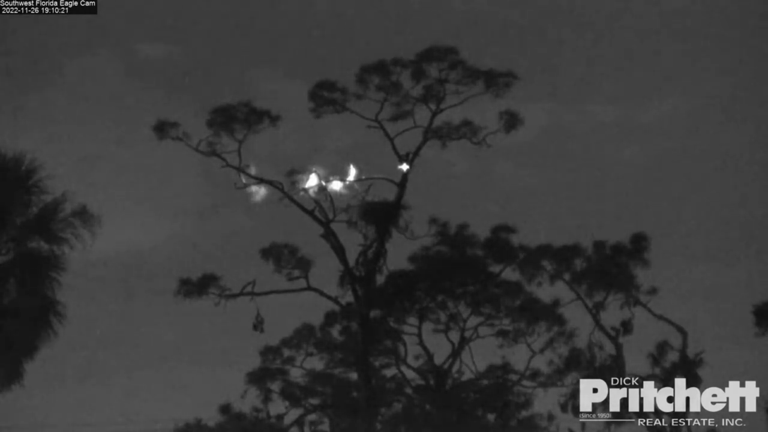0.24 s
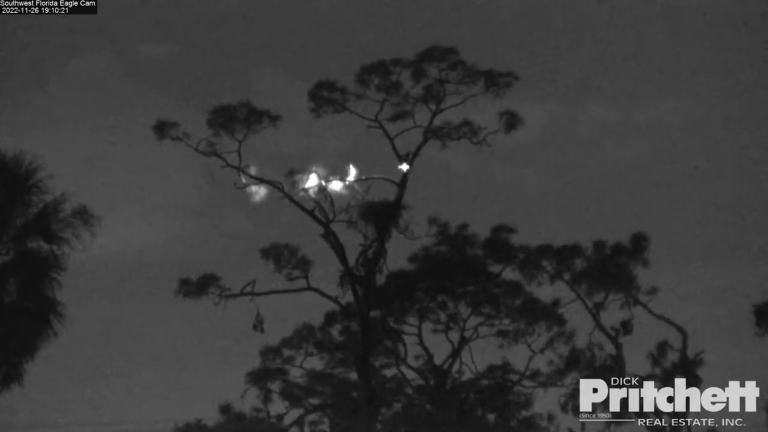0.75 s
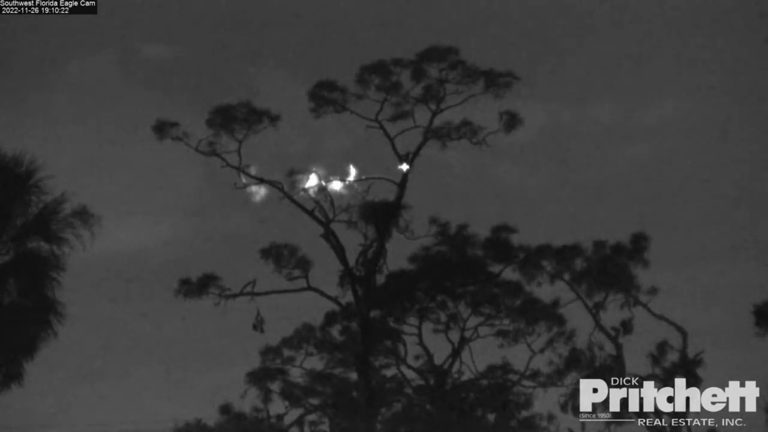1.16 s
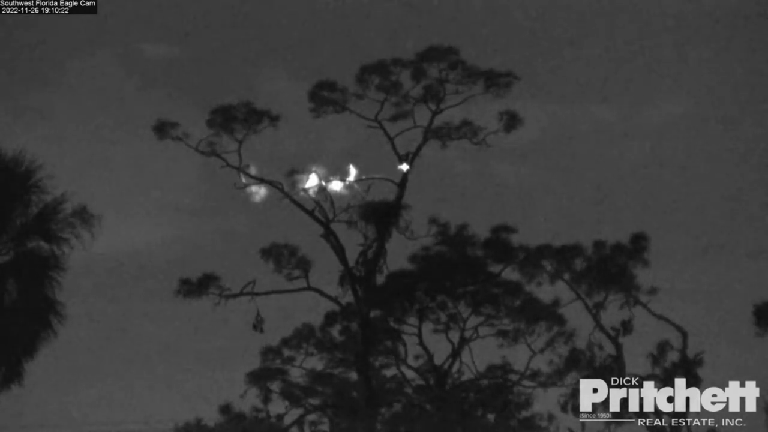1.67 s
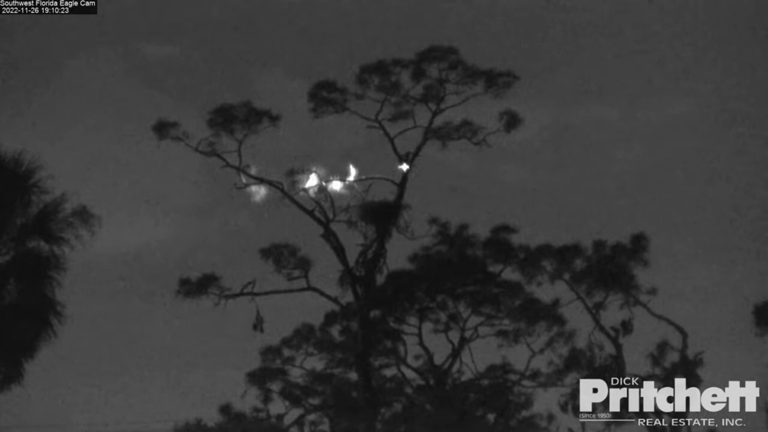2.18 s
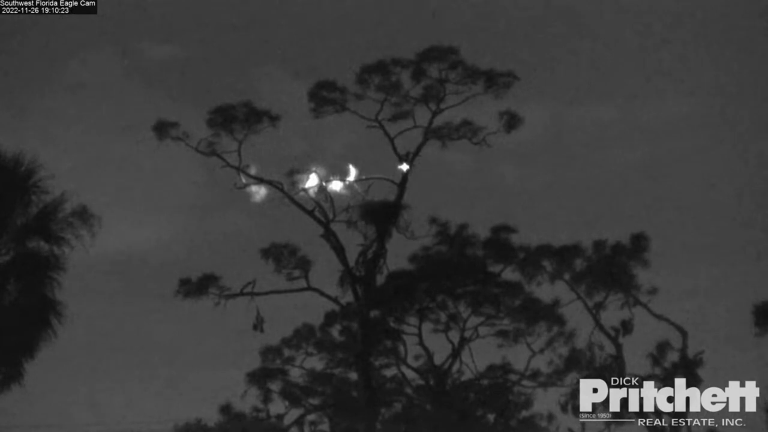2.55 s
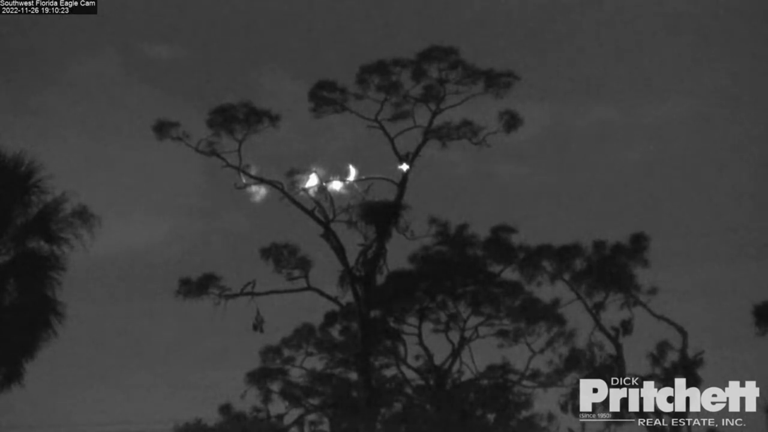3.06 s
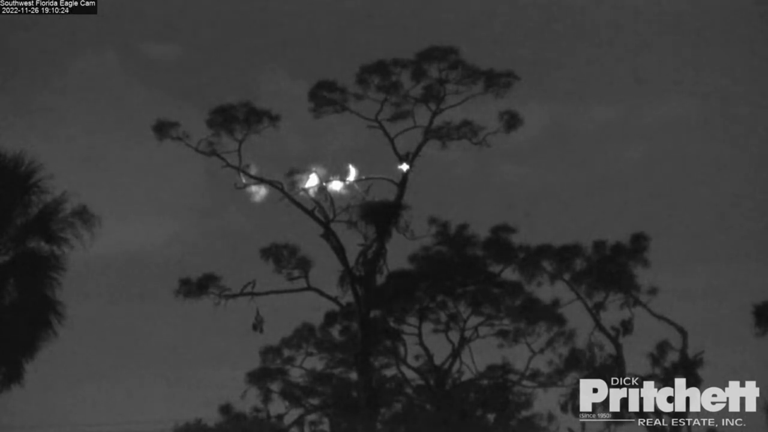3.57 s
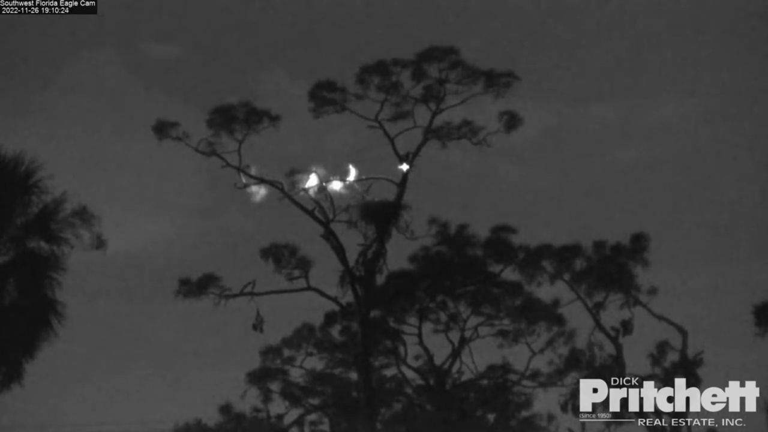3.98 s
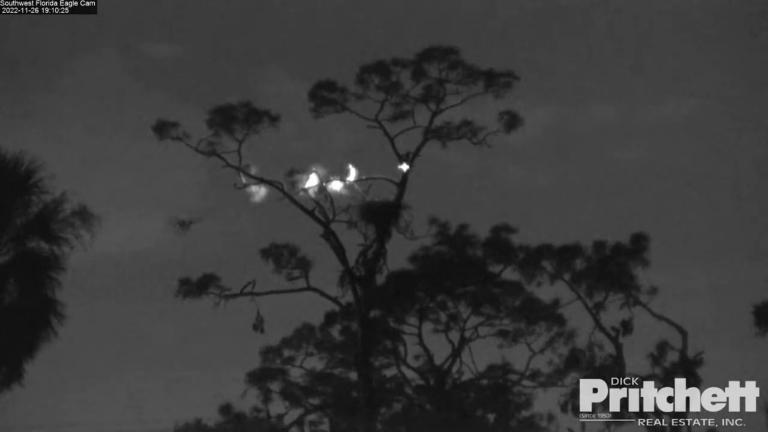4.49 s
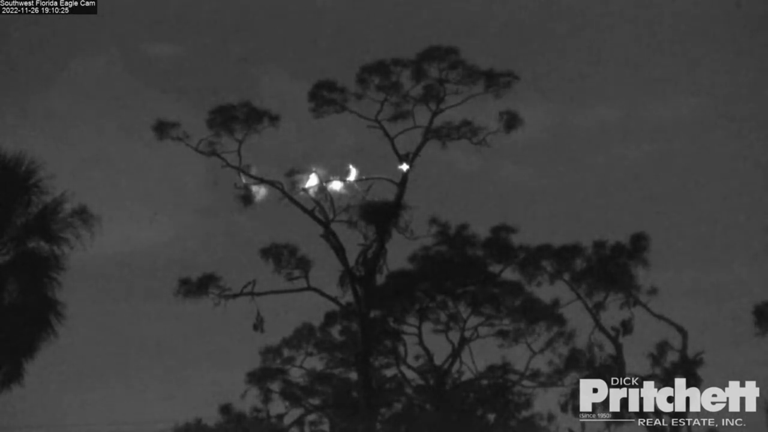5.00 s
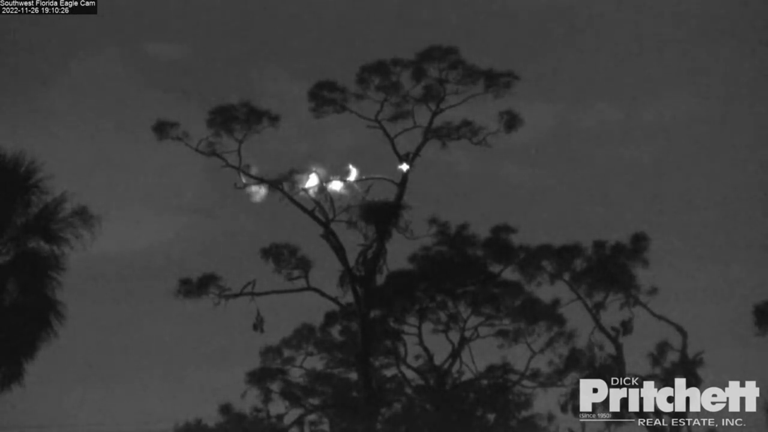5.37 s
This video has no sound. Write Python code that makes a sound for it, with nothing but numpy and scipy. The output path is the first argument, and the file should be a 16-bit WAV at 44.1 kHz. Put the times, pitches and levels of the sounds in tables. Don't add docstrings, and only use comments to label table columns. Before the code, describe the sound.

Steady low wind thump and a soft, slightly warbling marsh hiss lie under everything, with a blurred distant machine drone and a faint insect shimmer. Over them eagles call from a tree: brief cracking yelps first, then spaced, clear rising whistles, finally a yelp flipping into a held high note. Small birds add very faint chirps. Trunks give close, short echoes; the distant mono pickup sounds thinned by low-quality streaming.

```python
import sys
import numpy as np
from scipy import signal
from scipy.io import wavfile
from scipy.ndimage import uniform_filter1d

SR = 44100
rng = np.random.default_rng(int(sys.argv[2]) if len(sys.argv) > 2 else 0)


def store_wav(level_fs):
    pcm = np.round(np.clip(np.atleast_2d(level_fs), -1, 1) * 32767)
    wavfile.write(sys.argv[1], SR, pcm.T.astype(np.int16))


def boost_factor(decibels):
    exponent = np.asarray(decibels, float) / 20
    return 10 ** exponent


N = 248724

# f/Hz, level/dB [dB per Hz]
WIND_SPECTRUM = [(8.8, -29.5), (15, -4.5), (59, 0.5), (75, 1.5), (115, -13.5), (150, -26.5), (200, -35),
                 (260, -40.5), (340, -65.5), (570, -120)]
# t/s, level/dB
WIND_SWELL = [(0, -41), (.9, -40.5), (1.499, -40), (2.2, -41), (3.199, -39.5), (4.1, -41), (4.8, -40.5),
              (5.64, -41)]
# f/Hz, level/dB [dB per Hz]
MARSH_SPECTRUM = [(140, -37.5), (240, -12.5), (296, -23), (335, -2), (426, -5), (483, -22.5), (508, -10.5),
                  (653, -17.5), (710, -8.5), (839, -4), (1670, -3.5), (2100, -16.5), (2900, -26),
                  (3770, -55), (6380, -120)]
# f/Hz, level/dB [dB per Hz]
INSECT_SPECTRUM = [(2200, -27), (2900, -4), (3500, -5), (4100, -10.5), (4700, -9), (5200, -12.5),
                   (5900, -18.5), (6900, -19), (7800, -14.5), (8400, -17.5), (9300, -23), (9700, -39)]
# f/Hz, width f/Hz, level/dB
DRONE_HUMS = [
    (335.2, 18, -70),
    (426.7, 6.6, -77),
    (524, 12, -80.5),
    (707, 17, -70),
]
# f/Hz, then four columns of level/dB
THROAT_PARTIALS = [(1810, 1, -32, -56.5, -77), (1934, 1, -28, -40, -64), (1997, -3.5, -21.5, -35.5, -59),
                   (2078, -1, -14, -39.5, -61), (2310, 1, -29, -57.5, -63), (2420, -1.5, -20.5, -56, -60),
                   (2430, 0.5, -29, -56, -66)]
# start t/s, length t/s, level/dB, lowest f/Hz, top f/Hz
YELPS_LOW = [
    (0.87, .102, -40.5, 1821, 2023),
    (2.034, .1, -40, 1858, 2137),
    (5.451, .06, -40, 1860, 2053),
]
# start t/s, length t/s, level/dB, pitch f/Hz, glide f/Hz
YELPS_HIGH = [
    (0.958, 0.028, -54, 2340, 31.5),
    (2.117, 0.053, -39.5, 2382, -72.5),
    (5.501, 0.19, -37.5, 2371, 32),
]
# t/s, pitch f/Hz, level/dB
REPLY = [
    (1.462, 2482, -66),
    (1.478, 2474, -48),
    (1.495, 2462, -46.5),
    (1.515, 2387, -42),
    (1.565, 2386, -41),
    (1.584, 2322, -37.5),
    (1.598, 2250, -50.5),
    (1.62, 2244, -63.5),
]
# start t/s, length t/s, climb begins after t/s, lowest f/Hz, top f/Hz
LONG_WHISTLES = [
    (2.506, 0.26, 0.028, 1923, 2071),
    (3.142, 0.33, .13, 1920, 2038),
    (3.963, 0.22, 0.017, 1882, 2115),
    (4.581, .438, .135, 1875, 2089),
]
# t/s, level/dB
SCRATCH_TIMES = [
    (2.037, -47),
    (3.14, -43),
    (4.583, -50),
]
# t/s, length t/s, pitch f/Hz, level/dB, buzz [0-1]
SMALL_NOTES = [(1.408, .075, 2477, -66, .6), (2.75, 0.029, 4130, -64, 0.1), (2.752, 0.028, 1945, -47.5, .3),
               (4.17, .04, 4130, -66.5, 0.23), (5.004, 0.022, 4140, -65, 0), (5.575, 0.037, 2910, -84, .2),
               (1.525, .033, 4400, -79, .2), (1.666, 0.025, 2400, -68.5, .28),
               (2.127, .018, 2746, -63, 0.1), (3.45, .055, 4240, -70.5, .24), (3.578, .057, 5230, -64, .4),
               (3.641, 0.018, 5180, -82, 0.5), (3.708, .048, 5160, -66, .4), (3.831, .048, 4025, -63, .3),
               (4.597, .04, 3400, -62, 0.3), (4.598, .035, 6730, -77.5, 0.4), (4.661, 0.057, 6600, -77, .3),
               (4.664, .06, 4660, -72, 0.6), (4.665, .059, 5570, -65.5, .5), (4.802, 0.049, 5670, -60, .5),
               (4.804, 0.06, 4670, -72.5, 0.6), (5.01, 0.057, 3660, -73.5, 0.3),
               (5.015, .03, 5590, -78, .4)]
# delay t/s, level/dB
WOOD_ECHOES = [
    (.006, -11),
    (.011, -18.5),
    (.019, -15.5),
    (.028, -22),
]
# f/Hz, step above band level/dB
STREAM_STEPS = [(300, -14), (900, -4), (1250, 4), (1550, 9), (2200, 9.5), (9000, 9.5)]
STREAM_BANDS = [0, 4, 8, 12, 16, 20, 24, 28, 32, 36, 40, 48, 56, 64, 72, 80, 88, 96, 108, 120, 132, 144,
                160, 176, 196, 216, 240, 264, 292, 320, 352, 384, 416]
STREAM_SHORTAGES = [.575, 1.18, 1.35, 1.95, 2.26, 2.36, 3.01, 4.41, 4.48, 5.24, 5.29]


def evened(x):
    return x / np.sqrt(np.mean(x ** 2) + 1e-20)


def add(mix, start, sound):
    part = mix[round(start * SR):][:len(sound)]
    part += sound[:len(part)]


def wander(count, hz):
    smooth = signal.butter(2, hz, fs=SR, output="sos")
    return evened(signal.sosfiltfilt(smooth, rng.standard_normal(count + 4000))[2000:-2000])


def noise(spectrum, curve, patchy_db, size, holes_db=0.):
    frames, hz = 4 * N // size + 5, np.fft.rfftfreq(size, 1 / SR)
    a, b, patches = rng.standard_normal((frames, len(hz), 3)).T
    patches = uniform_filter1d(patches, size=6, axis=0)
    patches = evened(uniform_filter1d(patches, size=12, axis=1))
    f, db = np.transpose(spectrum)
    colour_db = np.interp(np.log(hz + 1), np.log(f), db, left=-120, right=-120)[:, None]
    holes = np.maximum(patches - 1.6, 0) * (hz > 900)[:, None]
    field_db = colour_db + patchy_db * patches - holes_db * holes
    x = signal.istft((a + 1j * b) * boost_factor(field_db), nperseg=size, noverlap=3 * size // 4)[1][:N]
    return evened(x) * boost_factor(np.interp(np.arange(N) / SR, *np.transpose(curve)))


def wind():
    return noise(WIND_SPECTRUM, WIND_SWELL, patchy_db=0.5, size=4096)


def marsh():
    start_db, rise_db = -59, 2.06
    curve = [(0, start_db), (N / SR, start_db + rise_db)]
    return boost_factor(2.0) * noise(MARSH_SPECTRUM, curve, patchy_db=1.26, size=1024, holes_db=4)


def insects():
    start_db, rise_db = -85, 3.5
    curve = [(0, start_db), (N / SR, start_db + rise_db)]
    return noise(INSECT_SPECTRUM, curve, patchy_db=2.0, size=1024)


def drone():
    t = np.arange(N) / SR
    total = np.zeros(N)
    for hz, width, db in DRONE_HUMS:
        hum = wander(N, width) * np.cos(2 * np.pi * hz * t) + wander(N, width) * np.sin(2 * np.pi * hz * t)
        total += boost_factor(db) * hum
    return total


def eagle_voice(rows):
    s, *columns = np.transpose(rows)
    t = np.arange(s[0], s[-1], 1 / SR)
    since = t - s[0]
    hz, db = (np.interp(t, s, c) for c in columns)
    pitch, *throat = np.transpose(THROAT_PARTIALS)
    ending = t[-1] - t + (t[-1] > 5.6)

    warble_hz, warble_s, warble_depth, warble_db, break_hz = 51.5, .065, .024, 2.5, 2200
    warble = (hz < break_hz) * np.exp(-since / warble_s) * np.sin(2 * np.pi * warble_hz * since)
    hoarse = .001 + 0.014 * np.exp(-since / 0.015) + 0.0045 * np.exp(-ending / 0.021)
    turns = np.cumsum(hz * (1 + warble_depth * warble + hoarse * wander(len(t), hz=81.8))) / SR

    glide = uniform_filter1d(abs(np.gradient(hz)), size=600) * SR
    rasp = np.clip(0.08 + glide / 4500, 0, .95)
    tone = 0
    for k, flutter_db in enumerate([1.1, 1.7, 1.9, 3.1]):
        level_db = np.interp(hz, pitch, throat[k]) + flutter_db * wander(len(t), hz=61.4)
        level_db += 2.8 * (k > 0) * wander(len(t), hz=15)
        angle = 2 * np.pi * (k + 1) * turns + rasp * np.sqrt(k) * wander(len(t), hz=107)
        tone = tone + boost_factor(level_db) * np.sin(angle)
    edge = np.clip(np.minimum(since, ending) / 0.0029, 0, 1)
    return s[0], np.sqrt(2) * boost_factor(db + warble_db * warble) * tone * edge


def yelp(start, length, db, low_hz, top_hz):
    scoop_hz, scoop_s, bow_hz, break_s = 198, .016, 16, 0.011
    middle_hz = (low_hz + top_hz) / 2 + bow_hz - 20
    return [(start, low_hz - scoop_hz, db - 9),
            (start + scoop_s, low_hz, db),
            (start + length / 2, middle_hz, db + 1.0),
            (start + length - break_s, top_hz - 30, db - 6.0),
            (start + length, top_hz, db - 14)]


def broken_note(start, length, db, hz, glide_hz):
    rise_s, fall_s, end_hz = 0.016, .012, hz + glide_hz
    return [(start, hz - 90, db - 21.5),
            (start + rise_s, hz, db),
            (start + length - fall_s, end_hz, db + 1),
            (start + length, end_hz, db - 36)]


def chirp(s, length, hz, db, buzz):
    t = np.arange(0, length, 1 / SR)
    rate_hz = 90 + 220 * buzz ** 2
    tremor = 1 - buzz + buzz * (wander(len(t), hz=rate_hz) + 1j * wander(len(t), hz=rate_hz))
    note = (tremor * np.exp(2j * np.pi * hz * t)).real
    return s, boost_factor(db) * note * signal.windows.tukey(len(t), .6) * 2.1


def scratch(start, db):
    return chirp(start, length=0.022, hz=1896, db=db, buzz=0.72)


def long_whistle(start, length, climb, low_hz, top_hz):
    scoop_hz, scoop_s, sag_s, steady_hz = 170.4, .012, 0.068, 1960
    crest_s, drop_s, drop_hz = .026, 0.022, 210
    cut_s, tail_s, tail_sag_hz = 0.0078, .032, 50
    base_db = -44 + 11.5 * length
    crest, end_hz = length - drop_s, top_hz - drop_hz
    held_hz = low_hz + (steady_hz - low_hz) * np.clip((climb - scoop_s) / sag_s, 0, 1)
    path = [(0, held_hz - scoop_hz, -4.5),
            (scoop_s, held_hz, 0),
            (climb, low_hz, 0),
            (crest - crest_s, top_hz, 0),
            (crest, top_hz - 25, 0),
            (length, end_hz, 0),
            (length + cut_s, end_hz - 30, -14),
            (length + tail_s, end_hz - tail_sag_hz, -21.5)]
    return [(start + s, hz, base_db + db) for s, hz, db in path]


def woods(x):
    taps = np.zeros(SR // 2)
    at = np.arange(900, len(taps) - 22, 22)
    at = at + rng.integers(0, 22, len(at))
    taps[at] = rng.choice([-1., 1.], len(at)) * boost_factor(-60 * at / SR / 0.042)
    taps *= boost_factor(-19.5) / np.linalg.norm(taps)
    for s, db in WOOD_ECHOES:
        taps[round(s * SR)] = boost_factor(db)
    taps[0] = 1
    return signal.fftconvolve(x, taps / np.linalg.norm(taps))[:N]


def scene():
    background = wind() + marsh() + insects() + drone()
    eagles, thin = np.zeros((2, N))
    calls = [yelp(*row) for row in YELPS_LOW] + [broken_note(*row) for row in YELPS_HIGH]
    calls += [REPLY] + [long_whistle(*row) for row in LONG_WHISTLES]
    for rows in calls:
        add(eagles, *eagle_voice(rows))
    for row in SMALL_NOTES:
        add(thin, *chirp(*row))
    for row in SCRATCH_TIMES:
        add(thin, *scratch(*row))
    return (woods(eagles) + thin + background)[None]


def thrifty_stream(x):
    hop, lead = 1024, 1561
    first, widths = STREAM_BANDS[:-1], np.diff(STREAM_BANDS)

    n, k = np.arange(2 * hop), np.arange(STREAM_BANDS[-1])[:, None]
    window = signal.windows.kaiser_bessel_derived(2 * hop, 4 * np.pi)
    basis = window * np.cos(np.pi / hop * (n + .5 + hop / 2) * (k + .5)) * np.sqrt(2 / hop)
    fast = np.pad(signal.resample_poly(x, 160, 147), (lead, 3 * hop), "reflect")
    lines = basis @ np.lib.stride_tricks.sliding_window_view(fast, 2 * hop)[::hop].T

    hz = (np.array(first) + widths / 2)[:, None] * 24000 / hop
    db = 10 * np.log10(np.add.reduceat(lines ** 2, first) / widths[:, None] + 1e-20)
    usual_db = np.median(db, axis=1, keepdims=True)
    finer_db = .6 * np.maximum(db - usual_db - 4.5, 0)
    own_db = db + np.interp(hz, *np.transpose(STREAM_STEPS)) - finer_db
    own_db[:, 1:] = np.minimum(own_db[:, 1:], own_db[:, :-1] + 6.5)
    tallest_db = 20 * np.log10(np.maximum.reduceat(abs(lines), first) + 1e-10)
    own_db = np.minimum(own_db, tallest_db + 4.5)

    fall_db = 10.0 * np.log2(hz)
    shadow_db = np.maximum.accumulate(np.where(hz > 900, db, -200) + fall_db, axis=0) - fall_db - 29
    short_frames = np.round((np.array(STREAM_SHORTAGES) * 48000 + lead) / hop) - 1
    starved = np.isin(np.arange(db.shape[1]), short_frames)
    thrift_db = .8 * rng.standard_normal(db.shape) + 3.5 * (hz > 2700) * starved

    step = np.repeat(boost_factor(np.maximum(own_db, shadow_db) + thrift_db), widths, axis=0)
    rounded = np.sign(lines) * step * np.floor(abs(lines / step) ** .75 + .4054) ** (4 / 3)
    halves = (rounded.T @ basis).reshape(-1, 2, hop)
    joined = (halves[1:, 0] + halves[:-1, 1]).ravel()
    return signal.resample_poly(joined[lead - hop:], 147, 160)[:N]


def low_pass(x):
    return signal.sosfilt(signal.butter(12, 15600, fs=SR, output="sos"), x)


def record(dry):
    hiss = boost_factor(-97) * rng.standard_normal(dry.shape)
    mix = thrifty_stream(dry[0])[None] + hiss
    return low_pass(mix)


dry = scene()
out = record(dry)
store_wav(out)
```